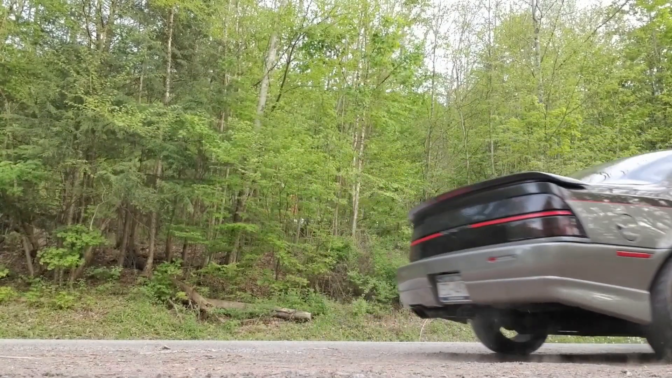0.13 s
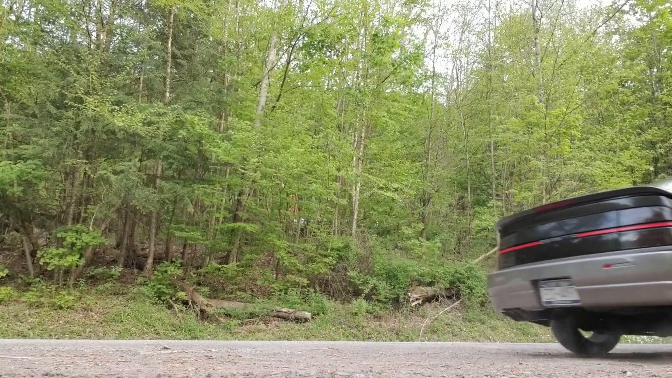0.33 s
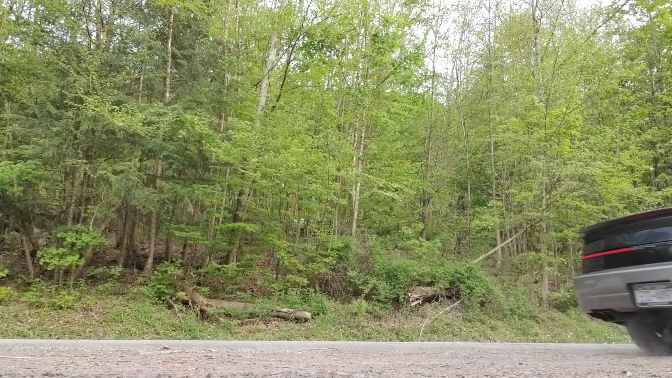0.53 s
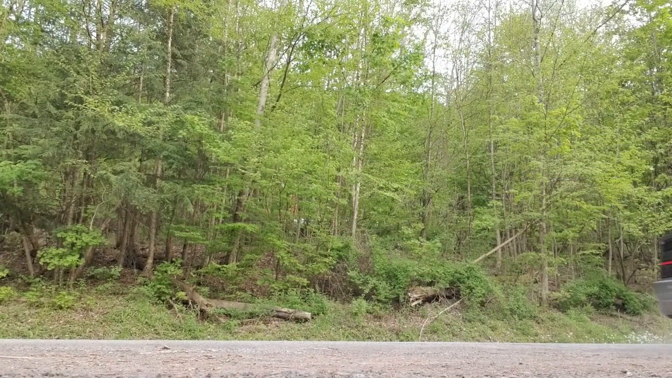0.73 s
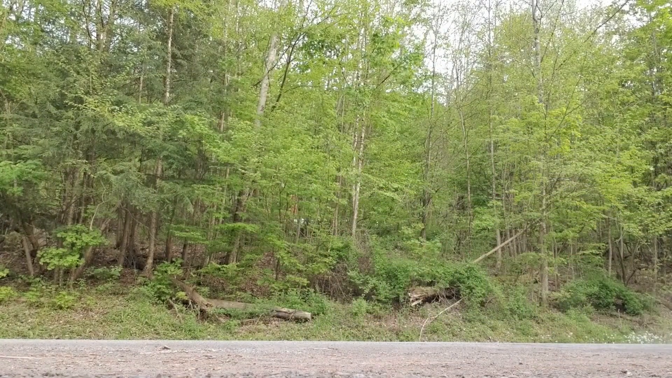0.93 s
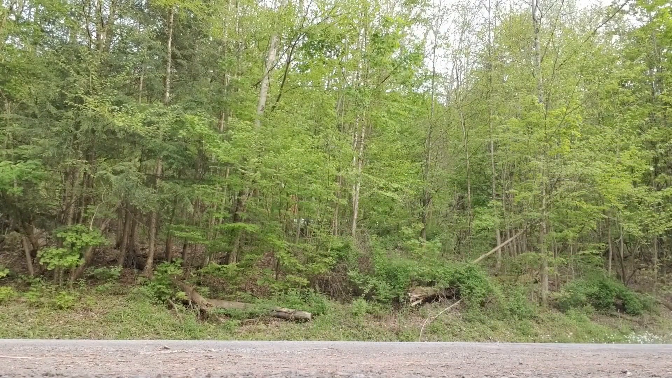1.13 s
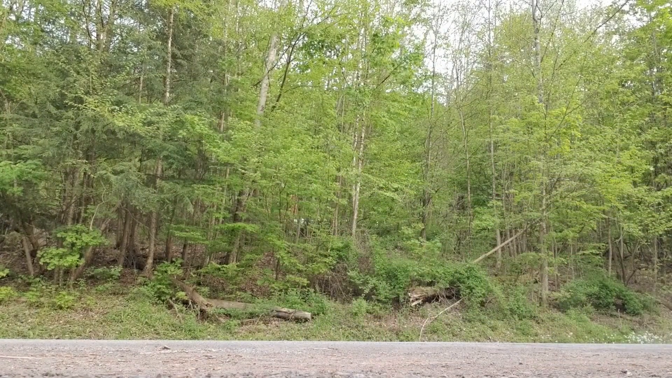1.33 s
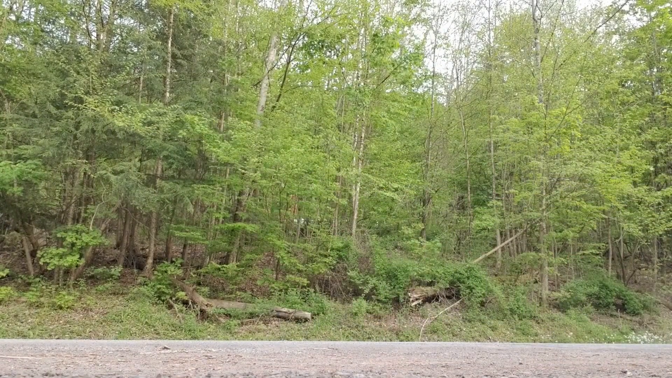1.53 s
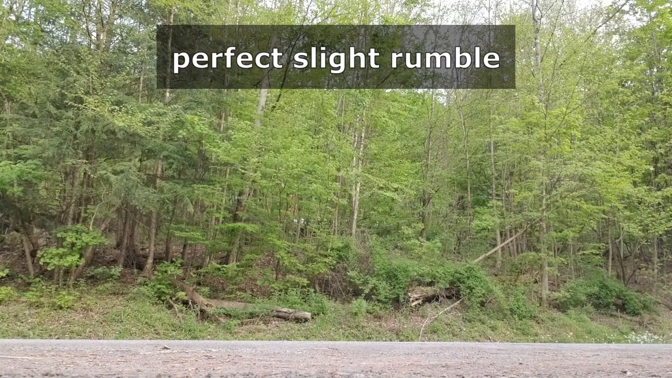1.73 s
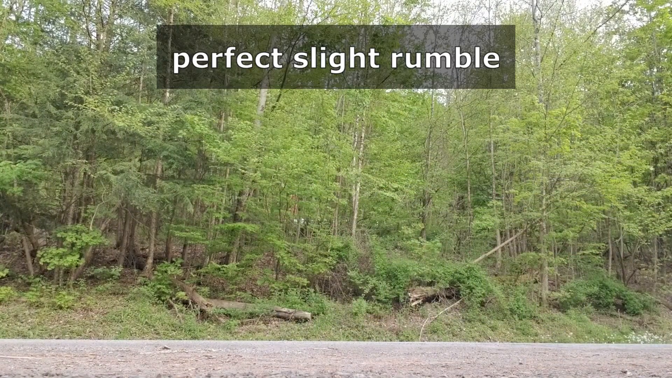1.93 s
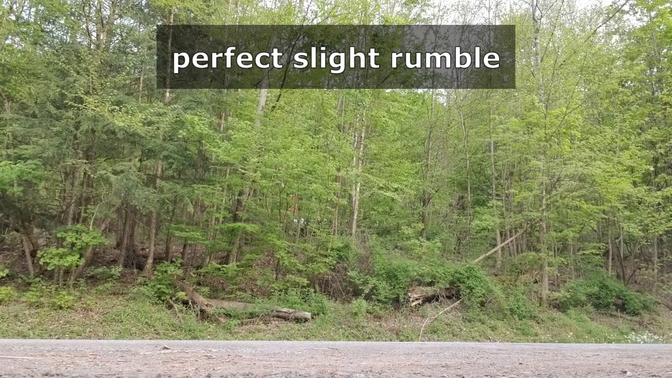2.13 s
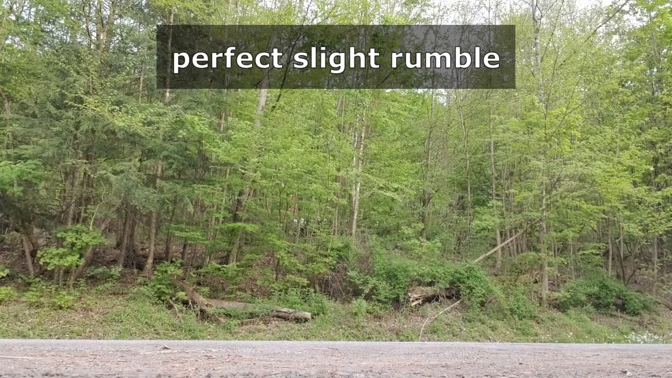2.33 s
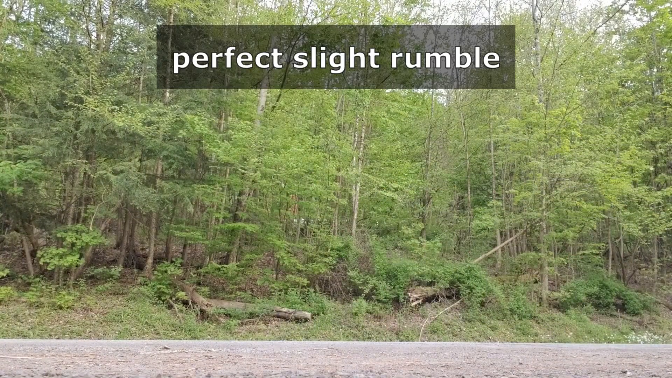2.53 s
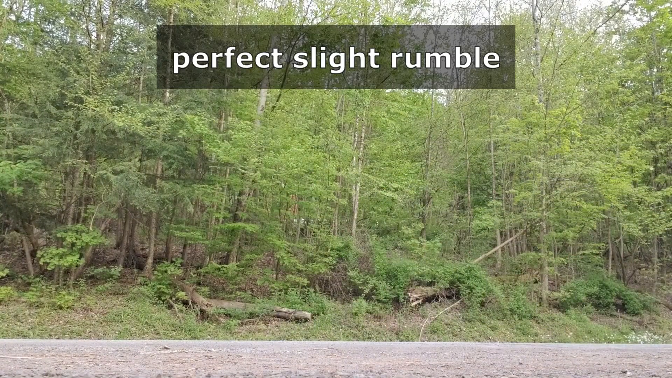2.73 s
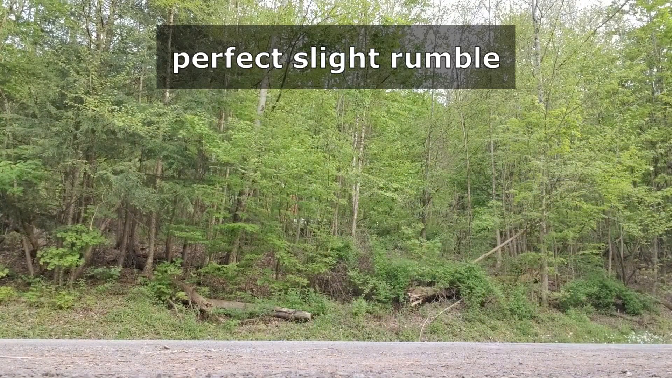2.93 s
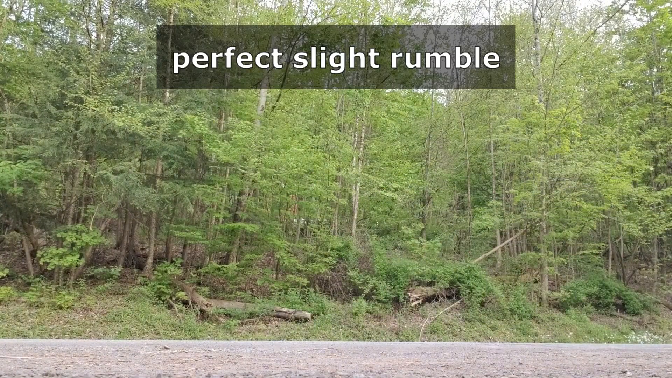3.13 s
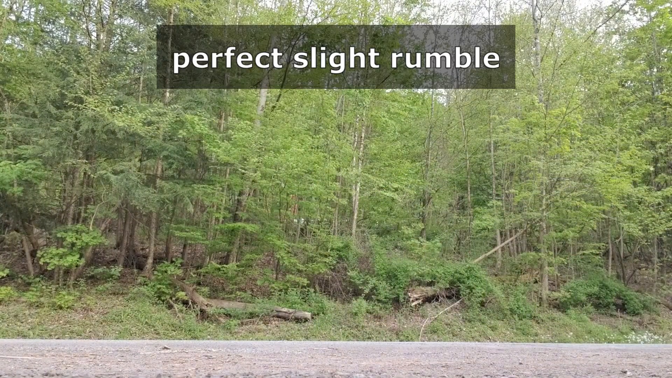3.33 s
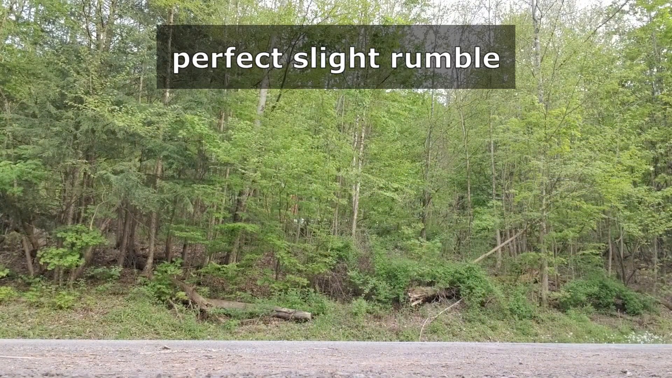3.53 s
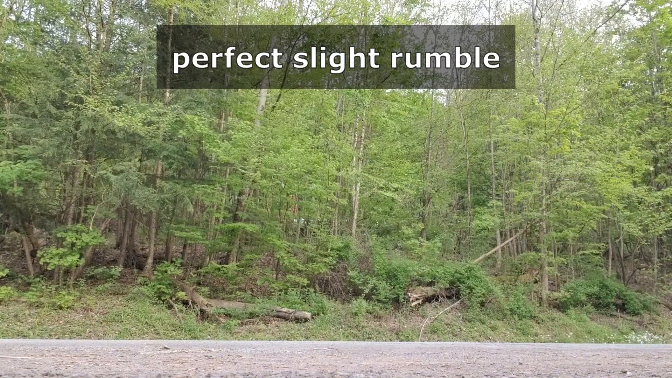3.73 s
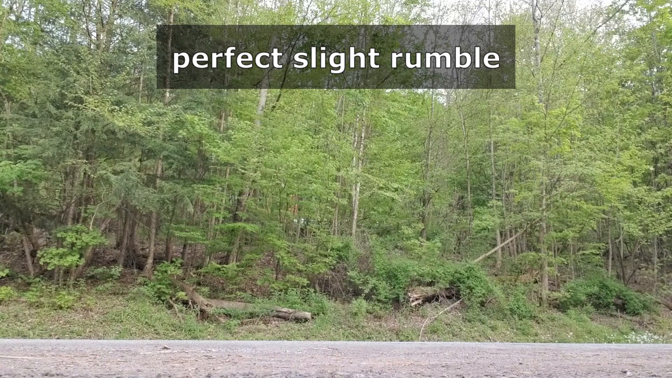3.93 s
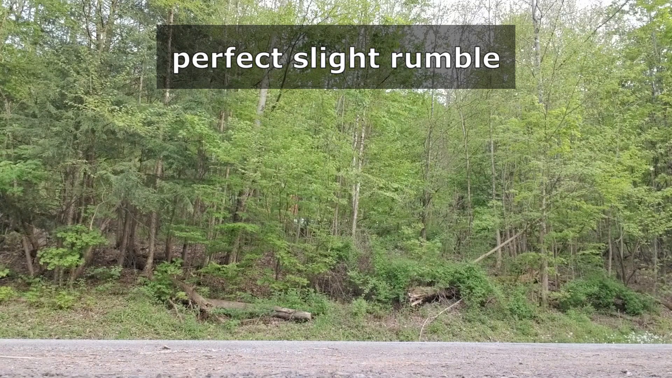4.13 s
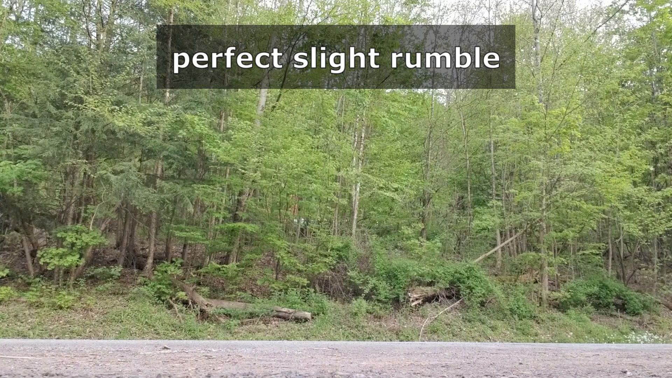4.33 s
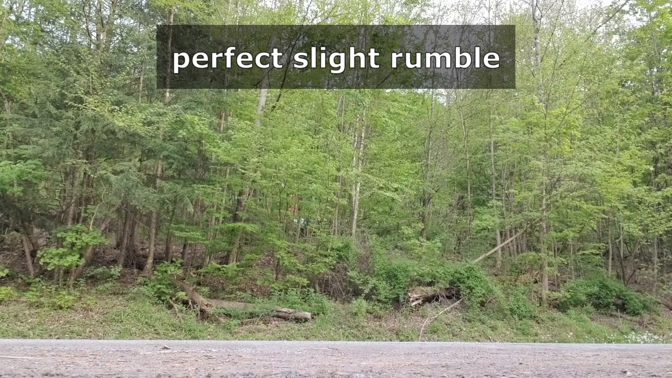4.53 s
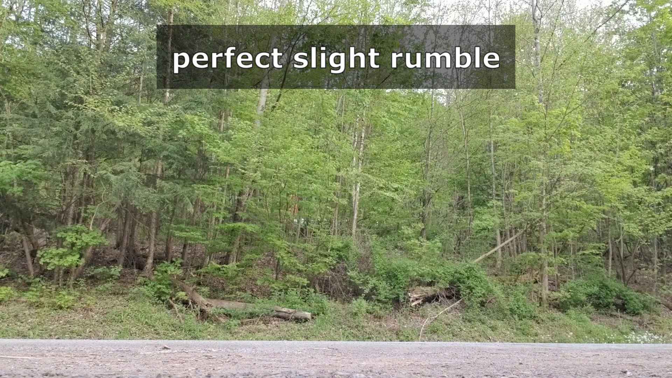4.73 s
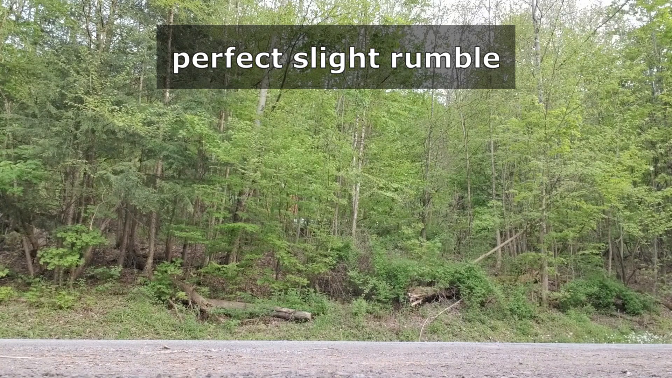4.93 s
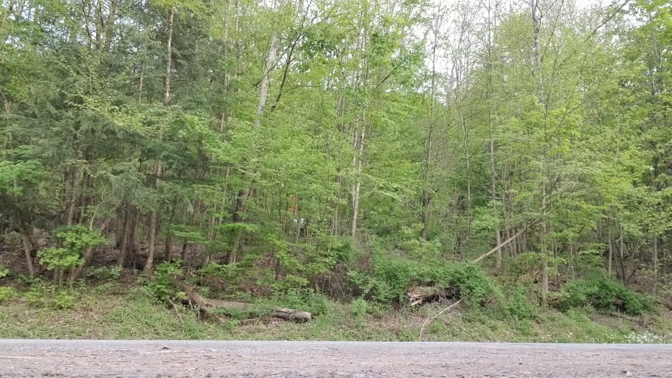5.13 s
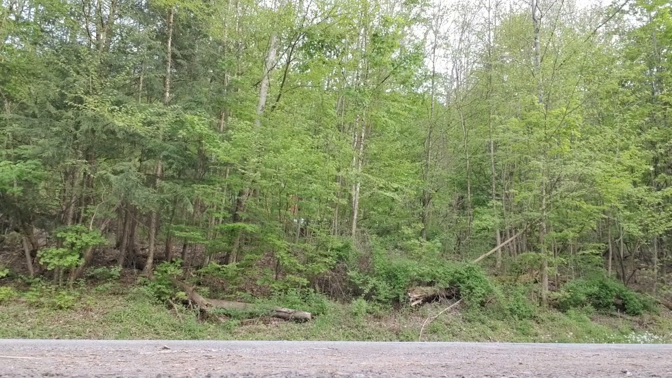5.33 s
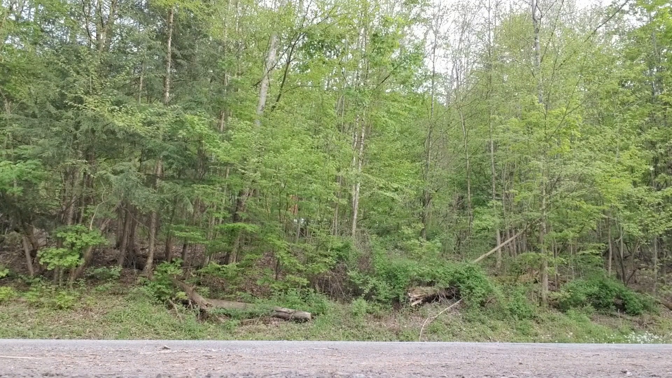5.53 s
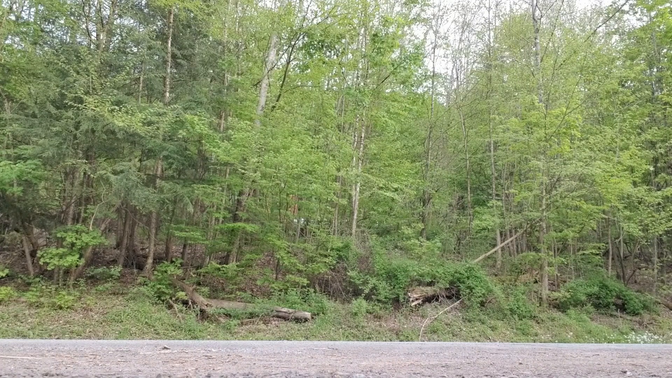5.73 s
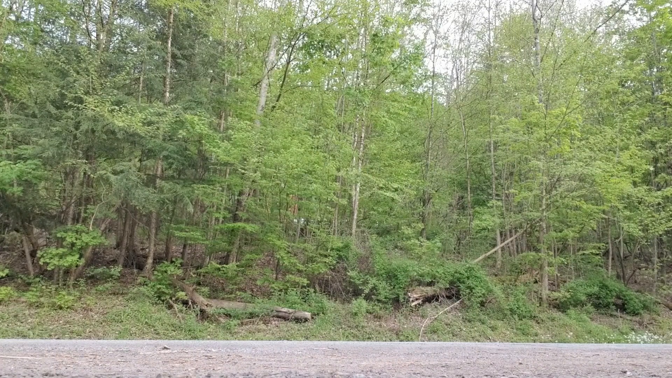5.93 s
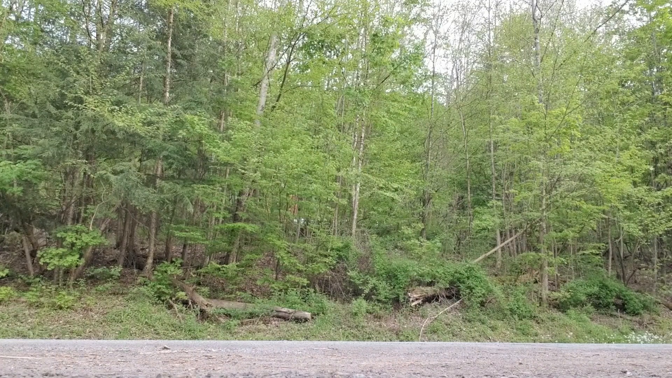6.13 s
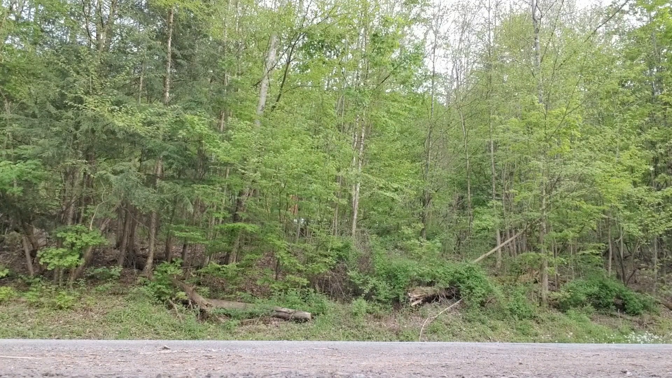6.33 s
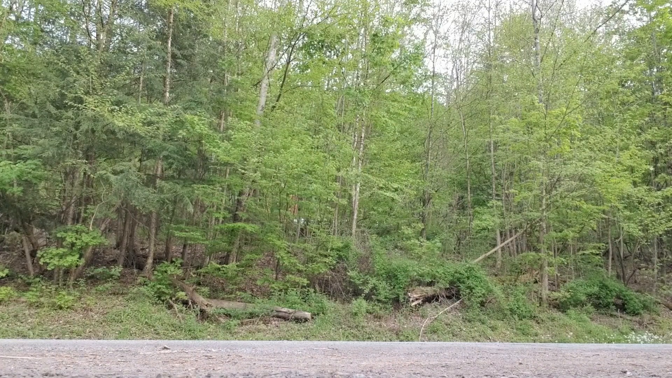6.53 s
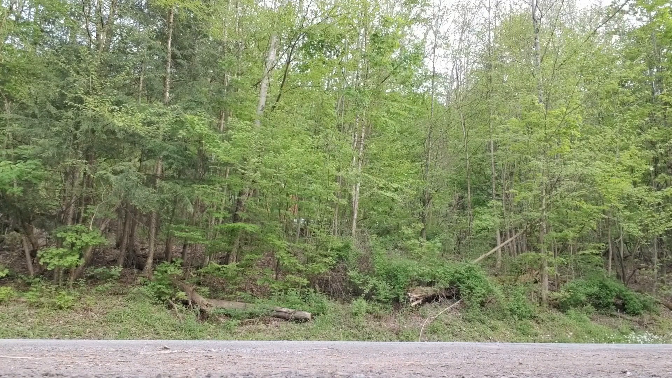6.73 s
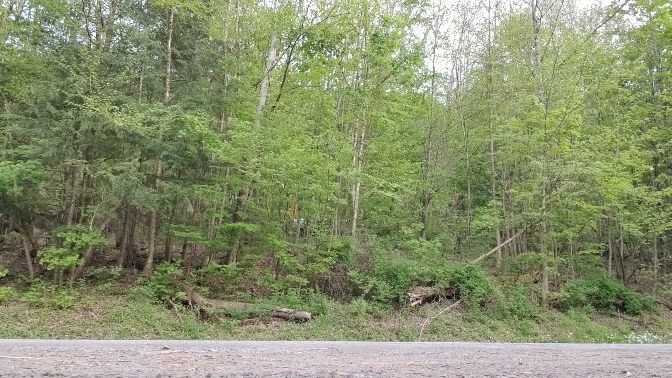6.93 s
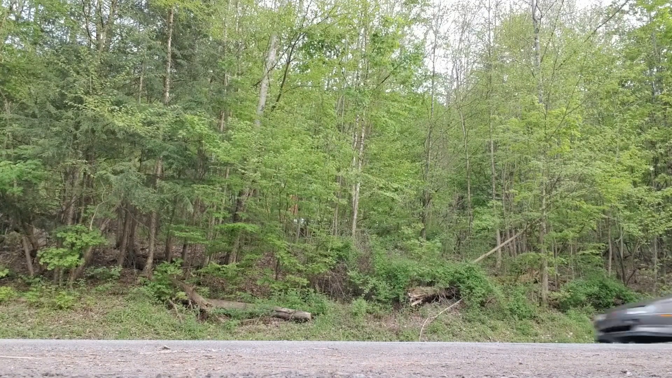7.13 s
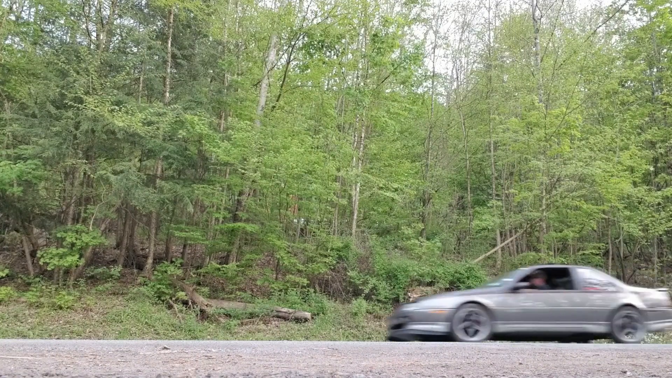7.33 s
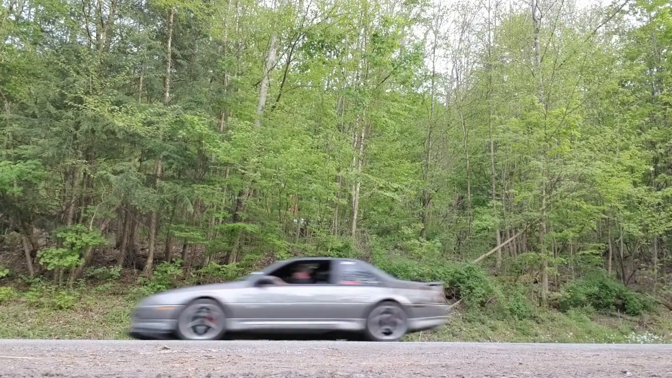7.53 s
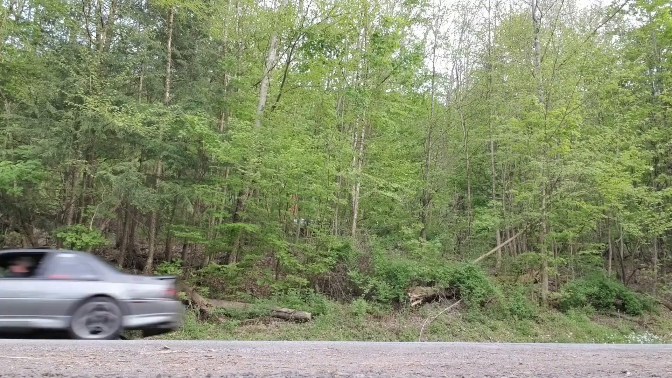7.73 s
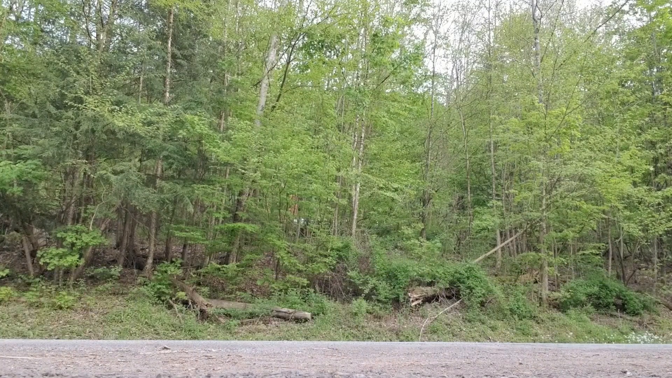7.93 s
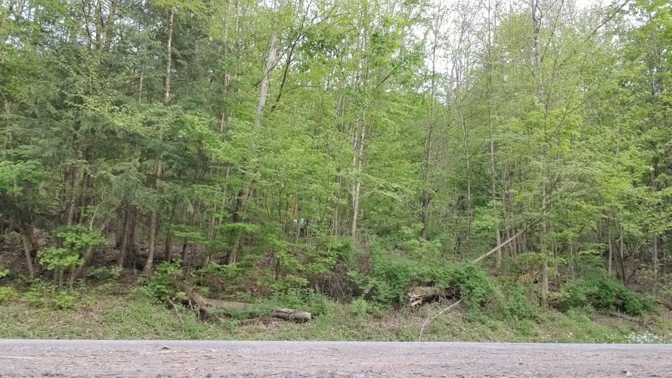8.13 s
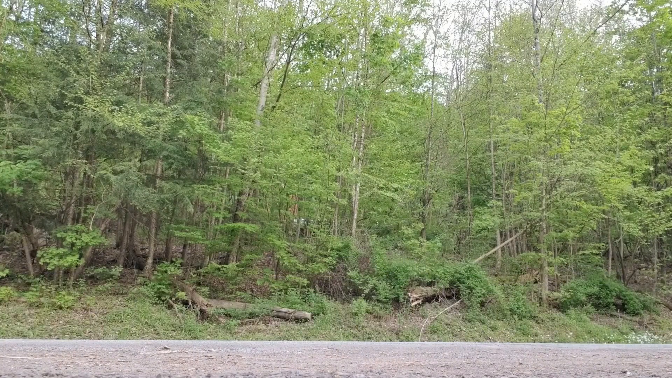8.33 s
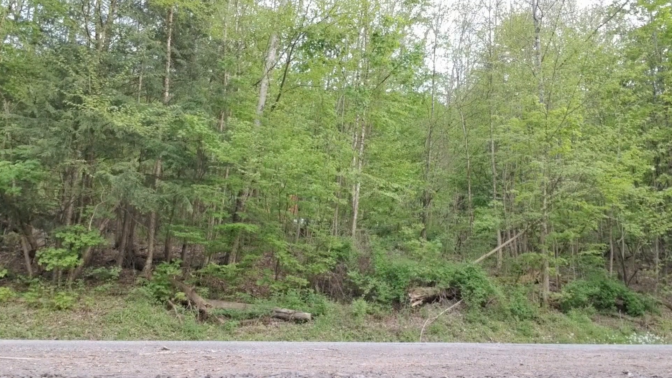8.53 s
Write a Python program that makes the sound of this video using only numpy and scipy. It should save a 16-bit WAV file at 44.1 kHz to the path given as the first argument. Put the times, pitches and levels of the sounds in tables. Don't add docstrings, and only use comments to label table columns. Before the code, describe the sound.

Outdoors by a forest road, a six-cylinder car with a throaty exhaust pulls away close to the microphone, loud and rising, a loose metal shield rattling. It lifts for one gear change, revs drop, and it recedes more softly. The scene cuts: a short upshift, then the car approaches at higher steady revs, swells with hissing tyres, sweeps past and fades. Small stereo microphone, dry open air, little deep bass.

```python
import sys
import numpy as np
from scipy import signal
from scipy.io import wavfile
from scipy.ndimage import uniform_filter1d

SR = 44100
rng = np.random.default_rng(int(sys.argv[2]) if len(sys.argv) > 2 else 0)


def linear_from_db(decibels):
    return 10 ** (np.asarray(decibels, float) / 20)


def master_out(mix):
    frames = np.transpose(np.atleast_2d(mix))
    ceiling = np.clip(frames, -1, 1)
    pcm = np.round(ceiling * 32767).astype(np.int16)
    wavfile.write(sys.argv[1], SR, pcm)


N = 379255
HOP = 128
RETURN_S = 5.135


def evened(x):
    return x / np.sqrt(np.mean(abs(x) ** 2) + 1e-20)


def spectrum_at(points, hz):
    f, value = np.transpose(points)
    return np.interp(np.log(hz + 1), np.log(f + 1), value)


def curves(rows, t):
    s, *rest = np.transpose(rows)
    return [np.interp(t, s, column) for column in rest]


def drift(shape, size):
    smooth = uniform_filter1d(rng.standard_normal(shape), size)
    return evened(uniform_filter1d(smooth, size))


def ramp(t, s, length):
    return .5 + .5 * np.tanh((t - s) / length)


def bump(t, s, length):
    return np.exp(-((t - s) / length) ** 2 / 2)


def joined(*dbs):
    return 10 * np.log10(sum(linear_from_db(db) ** 2 for db in dbs))


# time_s, left_port_lead_ms
BEARING = [(0, 0.28), (.8, 0.35), (2.5, 0.41), (4, 0.47), (5, .5), (6.6, 0.43), (6.9, .37), (7.25, .22),
           (7.55, -0.061), (7.7, -0.27), (8, -0.42), (8.6, -0.49)]


def leads(t):
    pipe = 0.81 * curves(BEARING, t - .14)[0] - .15 * np.exp(-t)
    return pipe, curves(BEARING, t)[0]


# start_s, end_s, extra_boom_db
COASTS = [
    (2.352, 2.89, 9.5),
    (5.135, 5.491, 10.5),
]


def states(t, order=3):
    throttle_s = 0.064
    early_s = 0.065 * (order == 1)
    shut = np.array([ramp(t, a, throttle_s) - ramp(t, b - early_s, throttle_s) for a, b, _ in COASTS])
    driving = 1 - shut.sum(axis=0)
    back = t > RETURN_S
    gone = ramp(t, 7.25 + 0.098 * order, 0.2)
    shares = np.array([driving * ~back, 1 - driving, driving * back * (1 - gone), driving * back * gone])
    return shares, np.transpose(COASTS)[-1] @ shut


# pitch_hz, likeness_0_to_1
SAME = [(100, 1), (500, 1), (2000, 0.91), (3500, 0.44), (6000, 0.26), (12000, .7)]
# pitch_hz, shade_db_per_ms of lead
SHADOW = [(300, -1), (1500, -2.5), (3500, 9.5), (6000, 7.5), (9000, 11), (13000, 6.5)]
# pitch_hz, left_minus_right_db
PORTS = [(100, 3), (400, 1.5), (700, 1), (1300, 2), (2400, 2), (3800, -4.5), (5800, 2), (6700, 6.5),
         (7300, 30), (8300, 19), (10000, 15.5), (12500, 9), (15500, 17.5)]


def noise_pair(level, lead_ms, hz):
    a, b, c, d = rng.standard_normal((level.shape[1], len(hz), 4)).T
    same = np.clip(spectrum_at(SAME, hz), 0, 1)[:, None]
    left = a + 1j * b
    late = np.exp(-2j * np.pi * hz[:, None] * lead_ms / 1000)
    right = same * left * late + np.sqrt(1 - same ** 2) * (c + 1j * d)
    shade = linear_from_db(spectrum_at(SHADOW, hz)[:, None] * lead_ms / 2)
    z = np.array([left * shade, right / shade / linear_from_db(spectrum_at(PORTS, hz))[:, None]])
    unit = np.sqrt(SR / 2 * 3 / (4 * HOP))
    return unit * signal.istft(z * level, nperseg=4 * HOP, noverlap=3 * HOP)[1][:, :N]


def at_ports(left, column, right_db):
    t = np.arange(N) / SR
    return np.array([left, linear_from_db(right_db) * np.interp(t - leads(t)[column] / 1000, t, left)])


# time_s, crank_hz (turns per second), effort_db
FIRST_GEAR = [(0, 34.47, -30.5), (.2, 37.66, -30), (.64, 44.65, -31), (.91, 49.24, -31.5),
              (1.47, 56.47, -31), (1.8, 59.75, -34), (2.24, 63.32, -33.5)]
SHIFT = [(2.38, 63.08, -37), (2.63, 62.7, -41.5), (2.74, 58.1, -42), (2.84, 47.16, -42.5),
         (2.97, 37.6, -46.5), (3.11, 40.67, -41.5), (3.2, 38.55, -43.5)]
SECOND_GEAR = [(3.33, 41.56, -40.5), (3.671, 43.5, -39.5), (4.04, 47.77, -40), (4.41, 51.6, -41.5),
               (4.91, 55.6, -41.5), (5.13, 56.8, -44.5)]
UPSHIFT = [(5.14, 89.9, -43), (5.241, 89.4, -46), (5.35, 83.6, -46), (5.5, 64.25, -44)]
PASSING = [(5.6, 66.85, -43.5), (6.09, 70.4, -34.5), (6.6, 73.7, -30.5), (7.1, 76.22, -23),
           (7.43, 77.92, -23.5), (7.749, 76.7, -28), (8.081, 74.86, -30.5), (8.301, 75.7, -34),
           (8.6, 76.1, -37)]
DRIVE = FIRST_GEAR + SHIFT + SECOND_GEAR + UPSHIFT + PASSING


def crank():
    t = np.arange(N) / SR
    hz = curves(DRIVE, t)[0]
    turns = np.cumsum(hz) / SR
    return np.array([turns, turns - hz * leads(t)[0] / 1000])


# pitch_hz, level_db
SILENCER = [(40, -1.5), (78, 9.5), (110, 0.6), (165, -0.5), (215, -20.5), (255, -18), (290, -9.5),
            (375, -23.5)]
# crank_order, pulling_away_db, coasting_db, approaching_db, gone_by_db
STRONG = [(1, -7.5, 2.5, -17.5, -3), (2, 4.5, -4, 3, 12), (3, 14, 9.5, 1, -4), (4, 8, 13.5, 12, 15),
          (6, 12.5, 5, 15, 30)]


def strong_orders(frames):
    effort_db = curves(DRIVE, frames)[1]
    early, boom_db = states(frames, order=1)
    bite_db = 19 * states(frames)[0][2] * np.exp(-abs(frames - COASTS[-1][1]) / 0.33)
    near = np.exp(-frames / 6.7)
    orders = []
    for k, *dbs in STRONG:
        pitch = curves(DRIVE, frames)[0] * k
        echo_db = -11 * np.exp(-((pitch - 93.6) / 5.7) ** 2 / 2) * near
        colour_db = spectrum_at(SILENCER, pitch) + echo_db
        db = effort_db + dbs @ states(frames, order=k)[0] + 4.3
        if k == 1:
            db = db + colour_db * (1 - early[1]) + boom_db
        else:
            db = db + colour_db + bite_db * (k == 3)
        orders.append((k, db, 1.25, .015))
    return orders


# pitch_hz, level_db
PIPE = [(20, -74.5), (100, 6), (200, -5), (250, -1.5), (300, 5.5), (370, -10), (475, 1.5), (560, -10),
        (700, -16), (1000, -40)]
# crank_order, level_db
ORDERS_DB = [(1.5, -13.5), (2.5, -8.5), (3.5, -8), (4.5, -5.5), (5, 0), (5.5, -10.5), (6.5, -9), (7, -4),
             (7.5, -13), (8, 1), (8.5, -1.5), (9, -7), (10, -2), (11, -4), (12, -2), (13, -6.5), (14, -4),
             (15, -7), (16, -10.5)]
# rasp against effort in level_db, its brightness in tilt_db_per_order
RASP_DB = [0.2, -2.5, -3, -6]
TILT_DB_PER_ORDER = [0.19, .01, .01, -.5]
LOW_HALF_DB = [5.5, 5, -6, -8]
HIGH_HALF_DB = [-2, -8, -0.5, 1]


def weak_orders(frames):
    hz, effort_db = curves(DRIVE, frames)
    shares = states(frames)[0]
    falling = uniform_filter1d(1. * (np.gradient(hz, frames) < -12), size=20)
    close = np.exp(-frames / 0.7)
    colour = 0.92 - 0.55 * close
    rasp_db = effort_db - 7 * np.exp(-frames / 0.12) - 0.36 * (frames - 1.5) * shares[0]
    rasp_db = rasp_db + RASP_DB @ shares + 1.5 * falling
    orders = []
    for k, order_db in ORDERS_DB:
        db = rasp_db + order_db + (k - 6) * (TILT_DB_PER_ORDER @ shares)
        if k % 1 > 0:
            db = db + (LOW_HALF_DB if k < 3 else HIGH_HALF_DB) @ shares
        db = db + 5.5 * ((k in (7, 10)) - (k == 8)) * close
        db = db + colour * spectrum_at(PIPE, hz * k)
        orders.append((k, db, 3.0, .007 * k))
    return orders


def exhaust(turns, frames):
    coarse, out = 8, 0
    t = np.arange(0, N, coarse) / SR
    strong = [(16, *row) for row in strong_orders(frames)]
    weak = [(36, *row) for row in weak_orders(frames)]
    for wobble_frames, k, db, swing_db, slip in strong + weak:
        wobble = drift(len(frames), size=wobble_frames)
        wander = drift(len(frames), size=14)
        phase = k * turns[:, ::coarse] + np.interp(t, frames, slip * wander) + .45 * rng.random()
        out = out + np.interp(t, frames, linear_from_db(db + swing_db * wobble)) * np.cos(2 * np.pi * phase)
    out = signal.resample_poly(out, coarse, 1, axis=1, padtype="line")[:, :N]
    return out * linear_from_db([[0], [-2.8]])


def roar(turns, frames, hz):
    shares = states(frames)[0]
    launch = np.exp(-frames / 0.16)
    level_db = curves(DRIVE, frames)[1] + 7 * launch + [-27.5, -21.5, -26.5, -23] @ shares
    level_db = level_db + 3.5 * bump(frames, 7.62, .13)
    gas = noise_pair(linear_from_db(spectrum_at(PIPE, hz)[:, None] + level_db), leads(frames)[0], hz)
    depth = [0.059, .11, 0.36, 0.06] @ shares + 0.51 * launch
    per_turn = 2.7 * np.exp(-(turns % 1) / 0.19)
    per_firing = 0.47 * np.exp(-(3 * turns % 1) / 0.32)
    puffs = uniform_filter1d(per_turn + per_firing - .9, size=60)
    return gas * (1 + np.interp(np.arange(N) / SR, frames, depth) * puffs)


def box(frames, ring_hz=478.2):
    t = np.arange(N) / SR
    hz, effort_db = curves(DRIVE, frames)
    shares = states(frames)[0]
    level_db = effort_db + [-3, -5, -4, 0] @ shares
    level_db = level_db + 3.5 * shares[0] * np.cos(2 * np.pi * ring_hz / hz)
    level_db = level_db + 12 * bump(frames, 8.02, .12)
    swing, wander = drift((2, len(frames)), size=24)
    hum = np.cos(2 * np.pi * (ring_hz * t + np.interp(t, frames, 0.072 * wander)))
    return at_ports(hum * np.interp(t, frames, linear_from_db(level_db + 1.2 * swing)), column=0, right_db=-6.5)


# time_s, level_db
ROAD = [(0, -29), (.3, -30.5), (1.5, -38), (2.2, -39.5), (3.0, -41.5), (3.6, -39.5), (5.13, -42.5),
        (5.14, -31.5), (5.5, -32), (6.0, -27), (6.8, -21), (7.25, -19), (7.5, -20.5), (7.8, -20),
        (8.05, -22.5), (8.6, -29)]


def wash_levels(t):
    near_db = curves(ROAD, t)[0]
    gravel_db = np.interp(t, (.8, 1.7, 2.68, 2.95), (0.1, 8.47, 10.6, 0.1))
    hiss_db = -7.5 + 0.94 * (near_db + 30) - 30.5 + gravel_db
    aside_ms = np.maximum(abs(leads(t - .08)[1] - 0.039) - 0.1, 0)
    beam_db = -46.5 + 1.62 * (hiss_db + 27.0) - 150 * aside_ms ** 2
    fizz_db = joined(beam_db, -82, -49 - 24.5 * t)
    grit_db = hiss_db + [-17, -17, -19, -13.5] @ states(t)[0]
    grit_db = grit_db + .2 * np.maximum(beam_db + 56, 0)
    return near_db, hiss_db, joined(grit_db, -60.5), fizz_db


# pitch_hz, level_db_per_hz
TREAD = [(60, -46), (400, -37), (750, -30.5), (1080, -30.5), (1500, -29.5), (2200, -32.5), (3000, -37.5),
         (4500, -41.5), (6000, -34), (7300, -29), (8500, -43), (11000, -27.5), (15500, -44.5), (16000, -34)]


def road(turns, frames, hz):
    low_db, mid_db, grit_db, top_db = wash_levels(frames)
    air_db = np.minimum(top_db, grit_db - 14.5)
    place = np.interp(np.log(hz + 1), np.log([1000, 2200, 5700, 11000]), np.arange(4))
    weights = np.maximum(1 - abs(place[:, None] - np.arange(4)), 0)
    field_db = weights @ [low_db, mid_db, grit_db, air_db] + spectrum_at(TREAD, hz)[:, None]
    patches = evened(uniform_filter1d(drift((len(hz), len(frames)), size=12), size=6, axis=0))
    field_db += patches - 0.1 * drift(len(frames), size=3)
    spare = np.sqrt(np.maximum(linear_from_db(top_db) ** 2 - linear_from_db(air_db) ** 2, 0))
    beat = 1 + 0.041 * np.cos(2 * np.pi * turns)
    return beat * noise_pair(linear_from_db(field_db), leads(frames)[1], hz) + fizz(turns, spare, frames, hz)


# pitch_hz, level_db_per_hz
FIZZ = [(8000, -75), (10800, -56), (11800, -43), (14000, -25), (16000, -31)]


def fizz(turns, level, frames, hz, hz_per_ms=8000.):
    off_ms = abs(leads(frames - .08)[1] - .03)
    colour_db = spectrum_at(FIZZ, np.maximum(hz[:, None] - hz_per_ms * off_ms, 1))
    hiss = noise_pair(linear_from_db(colour_db) * level, leads(frames)[1], hz)
    puffs = 2.4 * np.exp(-(turns % 1) / .08) + 1.1 * np.exp(-((turns + .5) % 1) / .08)
    facing = np.exp(-np.arange(N) / SR / 1.5)
    snaps = (rng.random(N) < 60 / SR) * linear_from_db(4.5 * np.minimum(rng.exponential(1, N), 3))
    crackle = 40 * uniform_filter1d(snaps, size=40)
    return hiss * (crackle + 1 + facing * (uniform_filter1d(puffs, size=24) - .45))


# time_s, peak_db
SHIELD = [(0.0155, -34), (0.0485, -38), (.0957, -34), (.1421, -32.5), (.2254, -38), (.352, -37),
          (0.406, -35), (.493, -36), (0.866, -36), (0.8956, -39), (0.9164, -43), (0.968, -40.5),
          (1.017, -39), (1.0831, -42), (1.142, -37), (1.165, -39.5), (1.2354, -36.5), (1.3576, -40),
          (1.4095, -39), (1.452, -38), (1.48, -43), (1.7657, -38), (1.791, -45), (1.8512, -42),
          (1.8924, -43), (2.234, -41), (2.3708, -36), (2.4842, -36), (2.5674, -44), (2.6648, -41)]


def shield(ring_hz=1875.0, rise_s=0.007, chatter_db=-47, chatter_per_s=74.0):
    t = np.arange(N) / SR
    knocks = linear_from_db(chatter_db) * rng.standard_normal(N) * (rng.random(N) < chatter_per_s / SR)
    knocks *= 1 - ramp(t, 3.1, .2) + ramp(t, 7.8, .05)
    for s, db in SHIELD:
        knocks[round(s * SR)] += linear_from_db(db + 7.0)
    t = np.arange(3000) / SR
    ring = t / rise_s * np.exp(1 - t / rise_s) * np.sin(2 * np.pi * ring_hz * t)
    return at_ports(signal.oaconvolve(knocks, ring)[:N], column=1, right_db=-6.0)


# pitch_hz, level_db_per_hz
SPRAY = [(1500, -68), (2500, -64.5), (3500, -67.5), (4300, -76), (6000, -93)]


def spray(frames, hz, peak_s=7.79, length_s=0.25):
    swell = bump(frames, peak_s, length_s) * linear_from_db(2.4 * drift(len(frames), size=2))
    outside = abs(np.log2(hz / 3000 + 1e-3)) > 1
    colour = linear_from_db(spectrum_at(SPRAY, hz) - 60. * outside)
    return noise_pair(colour[:, None] * swell, leads(frames)[1], hz)


def scene():
    frames = np.arange(N // HOP + 2) * HOP / SR
    hz = np.fft.rfftfreq(4 * HOP, 1 / SR)
    turns = crank()
    engine = exhaust(turns, frames) + roar(turns, frames, hz) + box(frames)
    return engine + road(turns, frames, hz) + shield() + spray(frames, hz)


def band_limit(x):
    return signal.sosfilt(signal.butter(12, 16770, fs=SR, output="sos"), x)


def record(dry):
    thin = signal.sosfilt(signal.butter(4, 46., "high", fs=SR, output="sos"), dry)
    thin = thin * signal.windows.tukey(N, .0012)
    lowpass = signal.firwin(511, 15760, window=("kaiser", 9), fs=SR)
    mix = signal.oaconvolve(thin, lowpass[None], "same")
    return band_limit(mix)


dry = scene()
out = record(dry)
master_out(out)
```